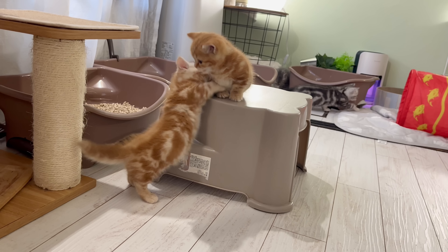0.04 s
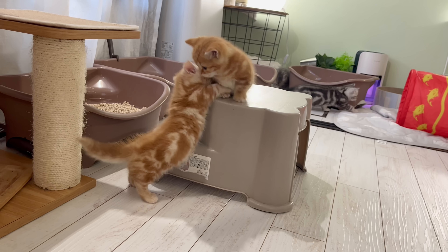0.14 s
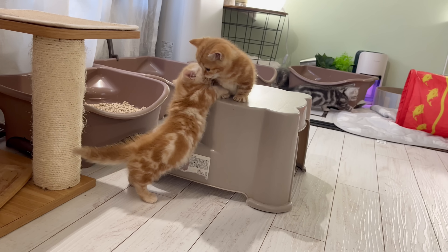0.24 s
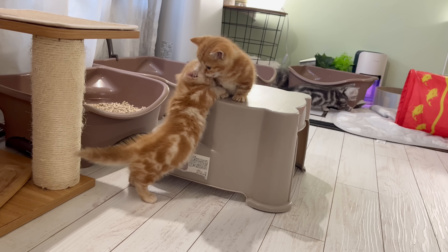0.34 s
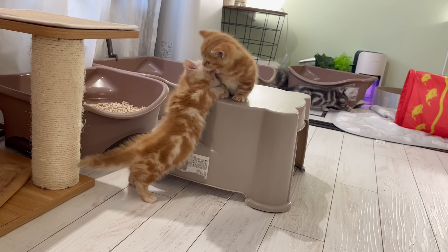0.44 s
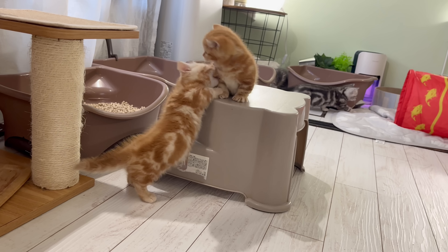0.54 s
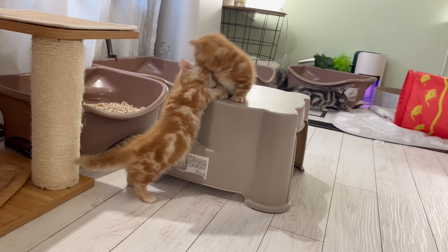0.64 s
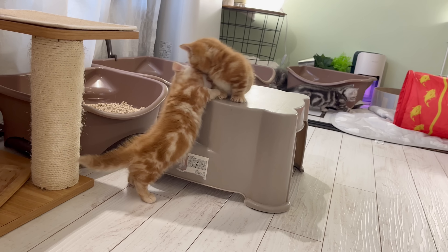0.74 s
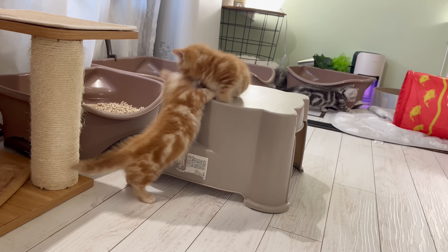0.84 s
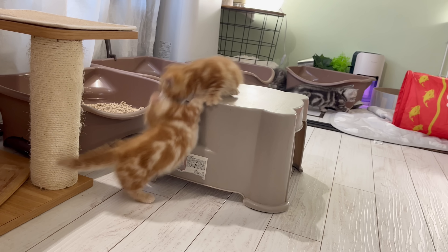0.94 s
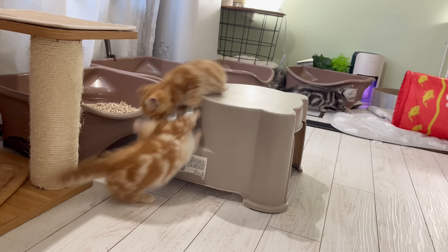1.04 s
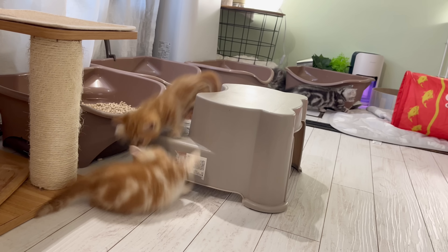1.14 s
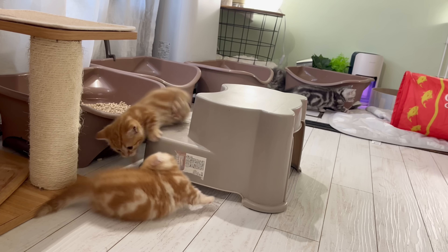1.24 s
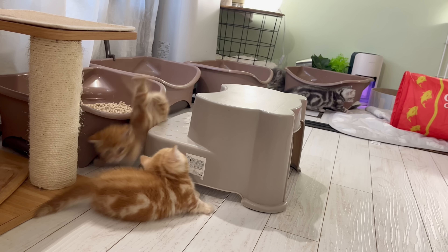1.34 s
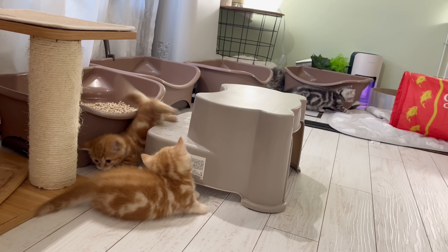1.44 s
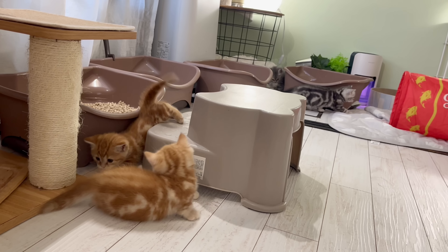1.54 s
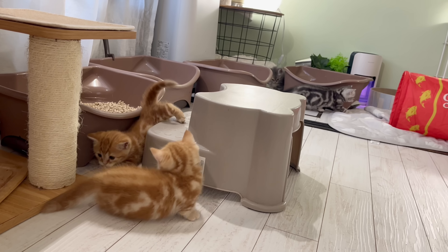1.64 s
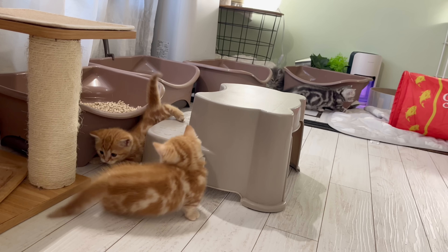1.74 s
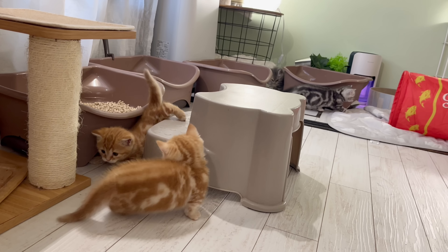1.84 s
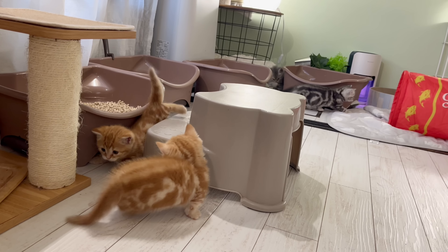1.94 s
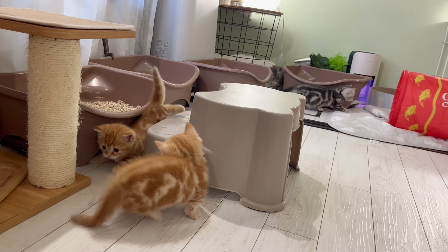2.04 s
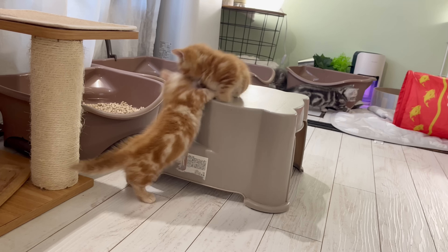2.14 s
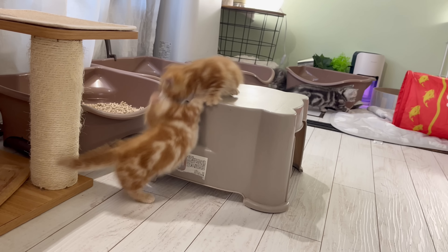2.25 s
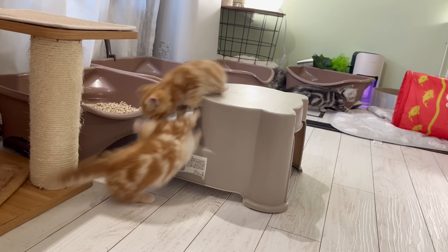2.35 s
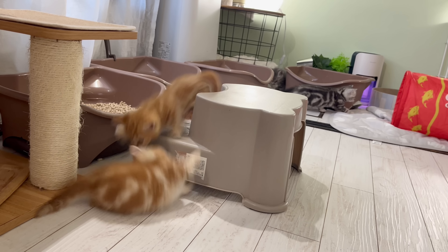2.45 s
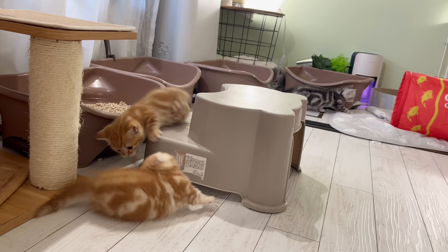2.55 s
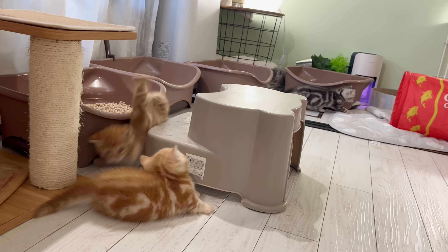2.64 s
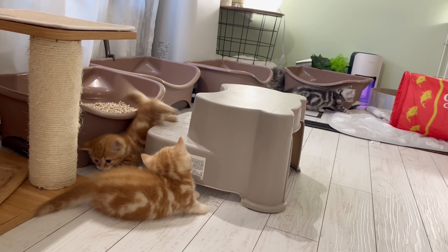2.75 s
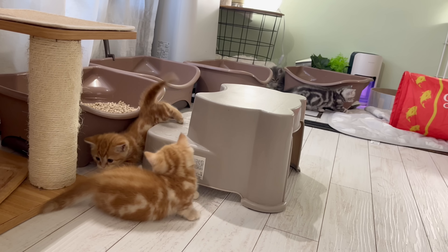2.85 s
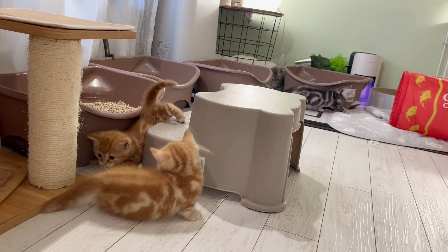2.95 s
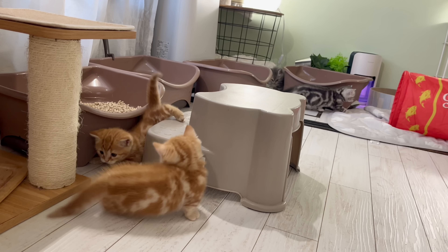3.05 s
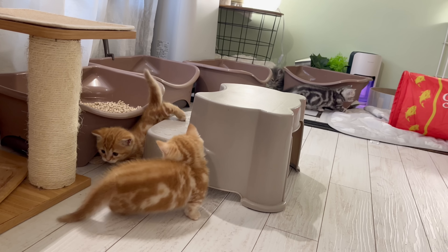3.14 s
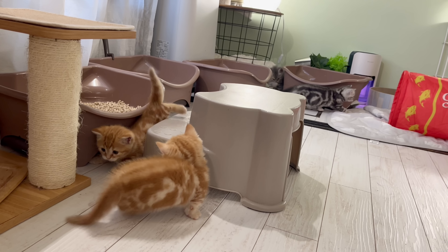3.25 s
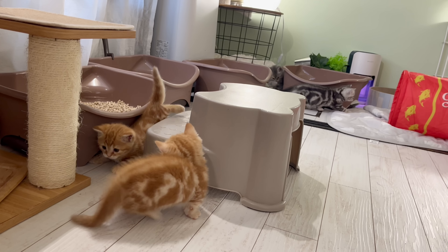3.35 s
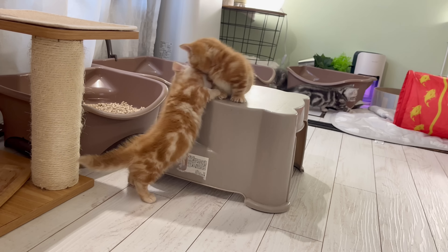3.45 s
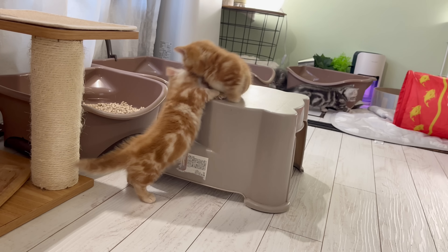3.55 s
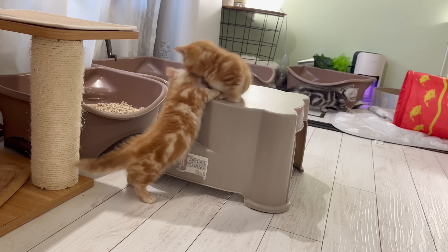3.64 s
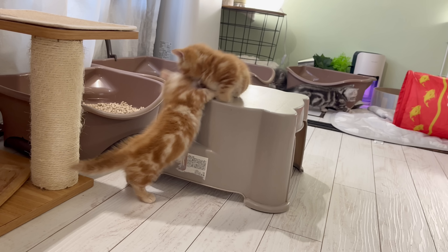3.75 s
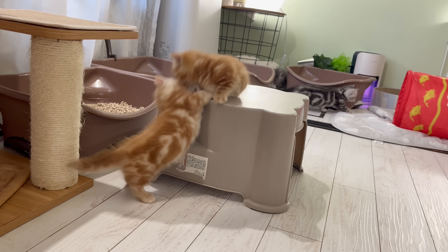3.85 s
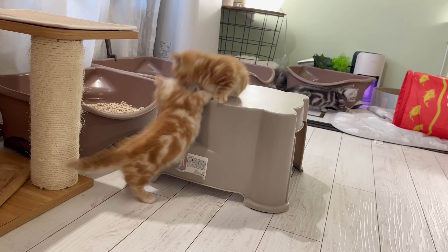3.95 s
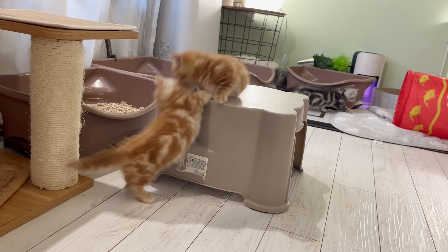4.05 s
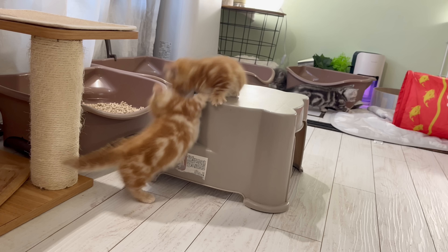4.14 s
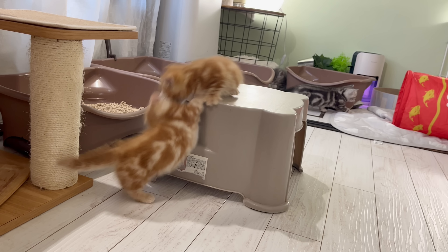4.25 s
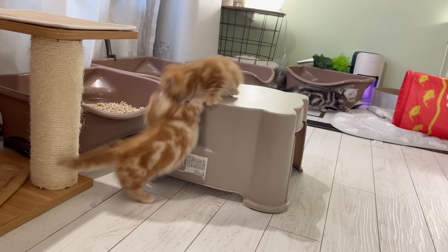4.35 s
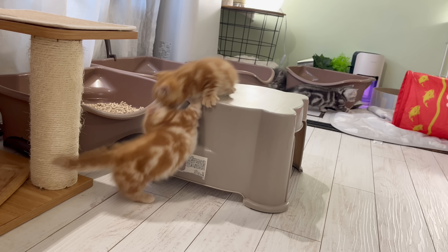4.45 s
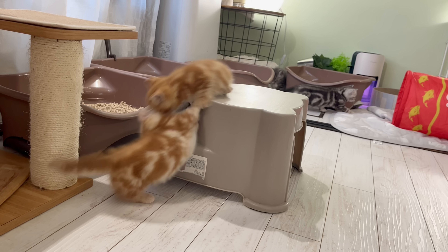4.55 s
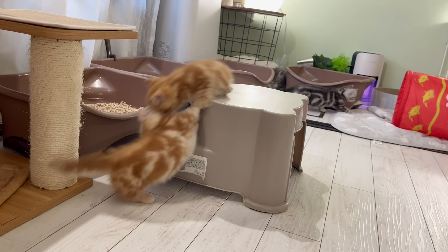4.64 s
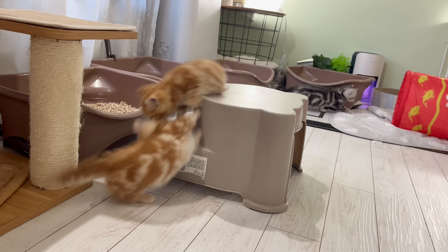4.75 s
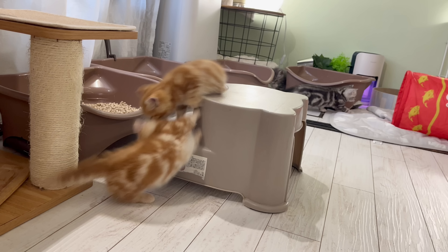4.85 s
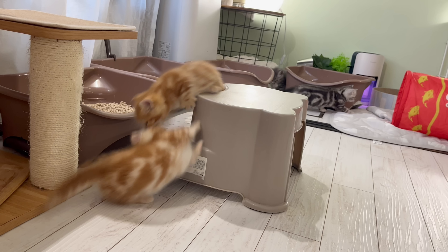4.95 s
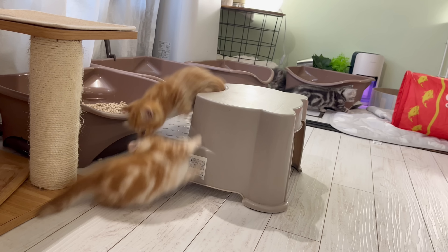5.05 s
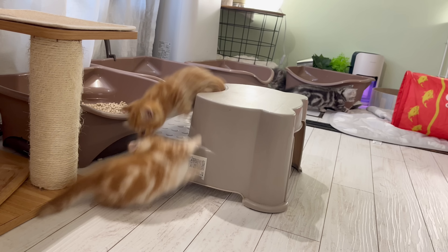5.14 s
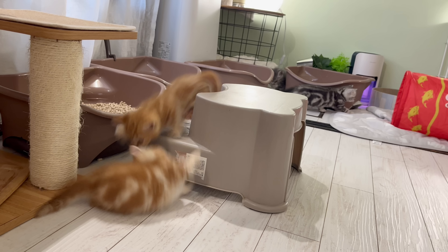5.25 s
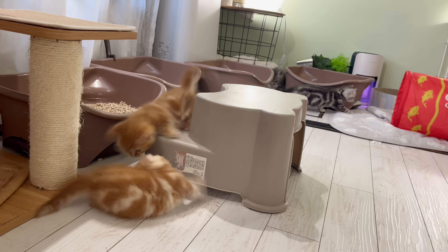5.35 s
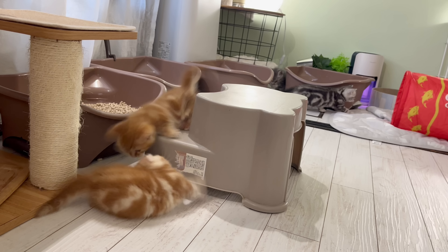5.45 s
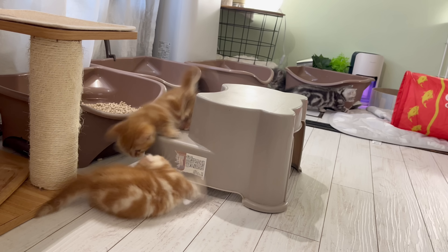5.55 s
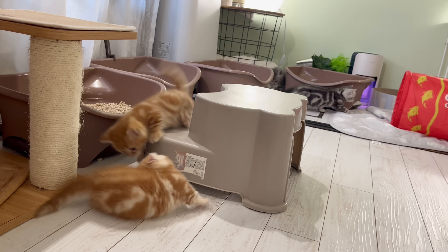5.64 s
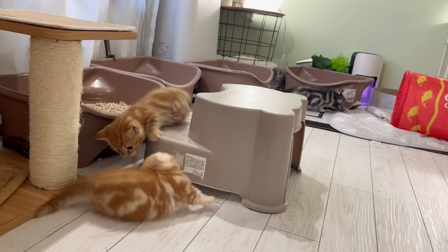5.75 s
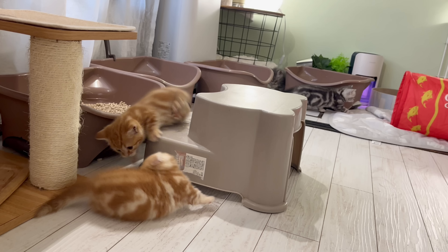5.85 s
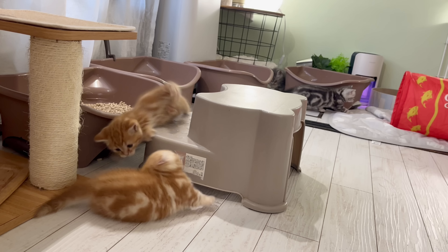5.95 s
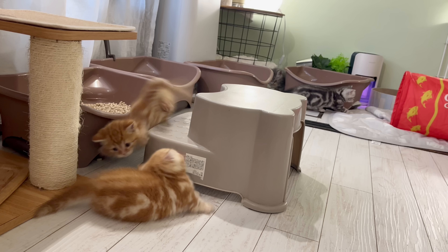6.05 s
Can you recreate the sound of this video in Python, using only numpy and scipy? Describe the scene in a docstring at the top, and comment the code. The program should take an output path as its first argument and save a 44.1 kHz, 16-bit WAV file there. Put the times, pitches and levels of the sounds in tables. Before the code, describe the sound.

Two kittens wrestle on a hollow plastic stool, heard close in stereo in a small furnished room. Faint thuds and scratches, then a loud clattering drop with boomy boards, ringing plastic and brief fur rustle, followed by a lighter scrabble. It plays a second time, then a slow-motion version chops it into short repeating pieces, turning single blows into rattling strings of thumps and scrapes.

```python
"""A quiet room, fans and distant rooms as wavering noise, heard in stereo through two microphone ports.
Kittens wrestle: shaking noise and soft pushes ring the floorboards, more strongly as they tumble off a hollow plastic stool.
Claws scratch its wall (gritty noise bursts and taps ring it), paws pat it (short hollow knocks), fur rustles (bright noise).
The fall is then played a second time, and a third time in slow motion, by short pieces that step back and overlap."""
import sys
import numpy as np
from scipy import signal
from scipy.fft import rfft, irfft
from scipy.io import wavfile
from scipy.ndimage import uniform_filter1d

SR = 44100
rng = np.random.default_rng(int(sys.argv[2]) if len(sys.argv) > 2 else 0)


def master_out(mix):
    """Clip the mix to full scale and print it as 16-bit PCM to the path in sys.argv[1]."""
    frames = np.transpose(np.atleast_2d(mix))
    ceiling = np.clip(frames, -1, 1)
    pcm = np.round(ceiling * 32767).astype(np.int16)
    wavfile.write(sys.argv[1], SR, pcm)


N = 269451

TOP_HZ = 16100  # top of the microphone's range
LIVE = int(2.2 * SR)  # samples of the first, live passage
TIME = np.arange(LIVE) / SR
FREQ = np.maximum(np.arange(LIVE // 2 + 1) * SR / LIVE, 1)
BOTH_SIDES = np.array([[1], [-1]])  # a side signal enters left upright, right inverted


def undb(db):
    """Amplitude factor for a level in dB."""
    return 10 ** (np.asarray(db) / 20)


def along(table):
    """A (Hz, value) table read at every frequency, on a logarithmic pitch scale."""
    hz, value = np.transpose(table)
    return np.interp(np.log(FREQ), np.log(hz), value)


def unit(x):
    """The signal scaled to rms 1."""
    return x / np.sqrt(np.mean(x ** 2))


def noise(colour):
    """Noise of rms 1 with the given colour."""
    spectrum = rfft(rng.standard_normal(LIVE))
    return unit(irfft(spectrum * undb(along(colour)), LIVE))


def add(track, s, sound):
    """Lay a sound into the track at s seconds."""
    i = int(s * SR)
    track[i:i + len(sound)] += sound[:len(track) - i]


def ring(modes, swell=0., ratio=-1):
    """Half a second of decaying modes after a unit blow; each swells over a share of its period.

    Each mode's amplitude is multiplied by one more ratio than the last; -1 turns every other mode over.
    """
    t = TIME[:SR // 2]
    total = 0
    for k, (hz, db, t60) in enumerate(modes):
        decay = 1000. ** (-t / t60)
        onset = 1 - np.exp(-t * hz / (swell + 1e-9))
        total = total + ratio ** k * undb(db) * np.sin(2 * np.pi * hz * t) * decay * onset
    return total


def air():
    """Quiet room tone of fans and distant rooms: coloured noise in mid and side, wavering a little."""
    # room tone colour: pitch_hz, relative level_db (per Hz)
    air_colour = [(25, -15), (55, -1), (110, -3.5), (170, -13.5), (300, -6), (600, -9), (750, -13.5),
                  (2100, -18.5), (2350, -24), (4500, -39), (7500, -87), (8500, -57.5), (11500, -50.5),
                  (13600, -63), (14200, -83)]
    # width of the room tone: pitch_hz, side_minus_mid_db
    air_width = [(60, -12), (110, -10.5), (200, -8.5), (380, -11), (700, -2.5), (1290, 1.5), (2380, -5.5),
                 (4400, 2), (8120, 13), (15000, -28)]
    mid_db, waver_db = -60, .8  # both rms
    side = irfft(rfft(noise(air_colour)) * undb(along(air_width)), LIVE)
    drift = unit(uniform_filter1d(rng.standard_normal(LIVE), size=4000))
    waver = undb(waver_db * drift)
    return undb(mid_db) * waver * (noise(air_colour) + side * BOTH_SIDES)


def boards():
    """Soft pushes, each nearer some modes than others, and a steady shaking drive the low modes of floor and stool."""
    # wrestling weight that shakes stool and boards: time_s, drive level_db
    shake_levels = [(0, -103), (.45, -86.5), (.62, -72.5), (.76, -82), (.86, -77), (1.0, -77),
                    (1.27, -70.5), (1.46, -67.5), (1.54, -80), (1.65, -94), (2.15, -100)]
    # weight landing on the boards: start_s, peak level_db at the boards, favoured pitch_hz
    landings = [(0.133, -49.5, 100), (0.393, -48, 67.5), (0.555, -53, 140), (0.606, -51, 150),
                (0.754, -49, 66.6), (0.832, -44.5, 70), (0.894, -41.5, 75.6), (.986, -33, 110),
                (1.022, -42.5, 110), (1.186, -20, 109), (1.197, -16.5, 82), (1.223, -24, 122),
                (1.258, -27, 95), (1.3, -39, 90), (1.329, -41.5, 89.5), (1.388, -33, 98),
                (1.413, -30.5, 127), (1.431, -29, 112), (1.465, -32.5, 80.5), (1.495, -47, 111),
                (1.629, -50, 70), (1.747, -51.5, 85)]
    # low modes of floor and stool: pitch_hz, level_db (before the mode ratio and nearness), t60_s
    board_modes = [(52, -8, .1), (67, 0, .13), (93, -1, .13), (124, -2, .11), (150, -7, .07),
                   (193, -12, .07)]
    contact_cycles = 0.23  # a push lasts this share of the period it favours
    shake = undb(np.interp(TIME, *np.transpose(shake_levels))) * rng.standard_normal(LIVE)
    out = signal.fftconvolve(shake, ring(board_modes, swell=0.23, ratio=0.96))[:LIVE]
    for s, db, spot_hz in landings:
        push = np.hanning(int(contact_cycles / spot_hz * SR))
        # modes lose level with the square of their distance in octaves
        near = [(hz, g - 15 * np.log2(hz / spot_hz) ** 2, t60) for hz, g, t60 in board_modes]
        boom = signal.fftconvolve(push, ring(near, swell=0.62, ratio=0.73))
        add(out, s, undb(db) * boom / np.abs(boom).max())
    return out


def spells(column, rise_db_s, fall_db_s):
    """Gain that climbs to each spell of rubbing, holds and falls away, both straight in dB."""
    # spells of rubbing on the stool: start_s, length_s, claw_scrape_db, fur_db
    rubs = [(0.9, 0.055, -63.5, -77.5), (1.078, 0.074, -66, -76), (1.193, 0.041, -55, -75.5),
            (1.407, 0.076, -63, -80)]
    gain = 0
    for row in rubs:
        start, length = row[:2]
        before = np.maximum(start - TIME, 0)
        after = np.maximum(TIME - start - length, 0)
        gain = gain + undb(row[column] - rise_db_s * before - fall_db_s * after)
    return gain


def claws():
    """Gritty bursts, each with its own colour, over a thin scrape; bursts and first-touch taps ring the plastic wall."""
    # claws on plastic: start_s, level_db, fade_ms (to 1/e), brightness_db per octave, low-cut pitch_hz
    scratches = [(0.868, -41, 14, -2.5, 2520), (0.948, -58.5, 22, -9.5, 1830), (1.077, -68, 3, 12.5, 1500),
                 (1.102, -46.5, 30, -8, 2630), (1.115, -52, 8.6, 5.5, 2800),
                 (1.1731, -31.5, 7.8, 3.5, 1460), (1.1811, -38, 2.7, -16.5, 1950),
                 (1.193, -41, 23, -5, 2200), (1.377, -65, 3.3, 6, 2400), (1.401, -42.5, 6.3, -1.5, 2700),
                 (1.422, -51.5, 15, -12, 1600), (1.444, -63, 20, -14.5, 1050),
                 (1.494, -56.5, 18, -14.5, 2010)]
    # colour of claw grit: pitch_hz, relative level_db (per Hz)
    grit_colour = [(900, -5.5), (1500, -2), (2000, -5), (2800, -4), (3900, -6), (4700, -7.5), (6000, -13),
                   (7500, -16), (9000, -18), (11000, -19.5), (13500, -35), (14500, -24), (16000, -58)]
    # modes of the thin wall: pitch_hz, relative level_db, t60_s
    wall_modes = [(1247, -10, .07), (1743, -10, .05), (1865, -7, .07), (2068, -1, .06), (2224, 0, .07),
                  (2470, -6, .06), (2620, -5, .05), (2741, -4, .05), (3112, -8, .04), (3630, -4, .06),
                  (4190, -7, .06), (4570, -3, .05), (4690, 0, .07), (4830, 0, .08)]
    rise_share = 0.16  # rise as a share of the fade
    wall_ring_db, wall_tap_db = -15, 24.5  # how strongly burst and first touch drive the wall
    tap_dull_db = -10.5  # per octave above 2200 Hz
    hard_db, hardness = -34, 1.1  # the drive changes this many dB more per dB above or below hard_db
    scrape_rest_db, scrape_rise_db_s, scrape_fall_db_s = -83, 350, 237

    out, drive = np.zeros(LIVE), np.zeros(LIVE)
    t_ms = TIME[:SR // 4] * 1000
    grit = unit(uniform_filter1d(rng.standard_normal(LIVE), size=40))
    hiss = noise(grit_colour) * undb(2.5 * grit)
    burst_len = LIVE // 8
    hz = FREQ[:LIVE // 16 + 1] * 8  # frequencies of the shorter transform
    tap_tilt = undb(tap_dull_db * np.log2(np.clip(hz / 2200, 1, 8)))
    for s, db, fade_ms, bright_db, low_hz in scratches:
        rise_ms = rise_share * fade_ms
        fade = np.exp(-np.maximum(t_ms - rise_ms, 0) / fade_ms)
        shape = np.minimum(t_ms / rise_ms, 1) ** 2 * fade
        tilt = undb(bright_db * np.log2(np.clip(hz, 500, 16000) / 3500))
        below = low_hz / hz
        low_cut = 1 / (1 - np.sqrt(2) * 1j * below - below ** 2) ** 2
        grain = shape * hiss[int(s * SR):][:len(t_ms)]
        burst = undb(db) * irfft(rfft(grain, burst_len) * tilt * low_cut)
        gentle_cut = low_cut / np.sqrt(np.abs(low_cut) + 1e-9)  # half as steep
        tap = undb(db + wall_tap_db) * irfft(gentle_cut * tap_tilt)
        add(out, s, burst)
        add(drive, s, undb(hardness * (db - hard_db)) * (undb(wall_ring_db) * burst + tap))
    wall = ring(wall_modes)
    wall_sound = signal.fftconvolve(drive, wall / np.linalg.norm(wall))[:LIVE]
    scrape = undb(scrape_rest_db) + spells(2, scrape_rise_db_s, scrape_fall_db_s)
    return out + scrape * hiss + wall_sound


def pats():
    """Short hollow knocks; the spot that is hit favours the modes near one pitch."""
    # paw pats on the stool wall: start_s, peak level_db at the stool, favoured pitch_hz
    paw_pats = [(.868, -48.5, 1540), (.903, -47.5, 322), (.941, -45, 765), (.980, -37.5, 295),
                (1.159, -33, 305), (1.177, -24.5, 414), (1.178, -35.5, 680), (1.183, -27.5, 355),
                (1.187, -28.5, 250), (1.203, -37.5, 855), (1.291, -40.5, 710), (1.379, -44.5, 790),
                (1.387, -39, 297), (1.405, -38, 760), (1.589, -49.5, 514)]
    # hollow body of the stool: pitch_hz, relative level_db (before nearness and scatter), t60_s (before the paw damps it)
    hollow_modes = [(250, 0, .06), (325, -2, .045), (365, 0, .05), (415, 1, .05), (500, -7, .035),
                    (655, 1, .045), (720, 0, .04), (810, -2, .035), (980, -7, .03), (1450, -5, .04)]
    paw_damp = 2.15  # the paw shortens the ring by this factor
    out = np.zeros(LIVE)
    for s, db, spot_hz in paw_pats:
        struck = []
        for hz, g, t60 in hollow_modes:
            far_db = 45 * np.log2(hz / spot_hz) ** 2
            scatter_db = 1.5 * rng.standard_normal()
            struck.append((hz, g - far_db + scatter_db, t60 / paw_damp))
        knock = ring(struck, swell=0.033)
        add(out, s, undb(db) * knock / np.abs(knock).max())
    return out


def fur():
    """A soft bright rustle, finer and steadier than the claws: coloured noise that follows the rubbing."""
    # colour of rubbing fur: pitch_hz, relative level_db (per Hz)
    fur_colour = [(2500, -19), (4500, 1), (7000, -8), (9000, 5), (11500, -3), (13700, -1), (14300, -14),
                  (16000, -37)]
    return spells(3, rise_db_s=298, fall_db_s=83) * noise(fur_colour)


def room(x):
    """Diffuse tail of decaying noise, band by band; bass and top are more alike in both channels than the middle."""
    # decay of the room: lower band pitch_hz, t60_s
    room_decay = [(100, 0.068), (500, 0.27), (2000, 0.3), (6000, 0.22), (14000, 0.033)]
    room_db, build_s = -7.5, 0.0025
    t, tail = TIME[:SR // 2], 0
    next_hz = [row[0] for row in room_decay[1:]] + [TOP_HZ]
    for (hz, t60), top in zip(room_decay, next_hz):
        upper = top * .5 if top < TOP_HZ else top
        band = signal.butter(2, [hz * .5, upper], "band", fs=SR, output="sos")
        mid, side = signal.sosfilt(band, rng.standard_normal((2, len(t)))) * 1000. ** (-t / t60)
        width = np.interp(np.log(hz), np.log([100, 2000, 14000]), [.7, .95, .6])
        tail = tail + mid + width * side * BOTH_SIDES
    tail = tail * (1 - np.exp(-t / build_s))
    tail = tail / np.linalg.norm(tail[0])
    return undb(room_db) * signal.fftconvolve(x[None], tail, axes=1)[:, :LIVE]


def ports(x):
    """The two microphone ports hear each channel with their own level and phase, split evenly between them."""
    # level between the ports: pitch_hz, left_minus_right_db
    port_level = [(60, 1), (200, 1.5), (1290, 1.5), (2380, 4), (4400, 8), (7500, .5), (15000, 0)]
    # phase between the ports; in opposite phase the centre loses the band: pitch_hz, left_lead_radians
    port_lead = [(100, 0), (950, .3), (1380, -.9), (2150, .7), (4220, .9), (5250, .1), (5680, -1.1),
                 (7060, -1.5), (7670, -3), (9560, -3.4), (10900, -5), (13400, -7.2), (15900, -9.4)]
    half = undb(along(port_level) / 2) * np.exp(.5j * along(port_lead))
    return irfft(rfft(x) * np.array([half, 1 / half]), LIVE)


def replay(live):
    """Each piece reaches back by its own lag and is cross-faded over the one before."""
    # each slow piece starts a little off its even place: further_back_ms
    slip_ms = [0, 2.14, -12.3, 2.74, 1.25, 6.48, -9.09, .64, -6.79, 8.91, -2.13, 7.27, 12.54, 4.43, 12.55,
               -8.71, 6.04, -2.48, 12.56, 2.68, .47, 3.63, 3.93]
    again_s, again_back_s = 2.118, 1.30054  # second playing: start, lag
    slow_s, slow_back_s = 3.4185, 2.58796  # slow motion: start, first lag
    slow_speed, piece_s, fade_s = .2, .11918, .0045
    t, out = np.arange(N), np.zeros((2, N))
    out[:, :LIVE] = live
    even = np.arange(len(slip_ms)) * piece_s
    # pieces run at full speed, but their starts advance through the fall at slow_speed
    backs = slow_back_s + (1 - slow_speed) * even + np.array(slip_ms) / 1000
    for s, back in zip([again_s, *(slow_s + even)], [again_back_s, *backs]):
        share = np.clip((t / SR - s) / fade_s + .5, 0, 1)
        earlier = live[:, np.clip(t - round(back * SR), 0, LIVE - 1)]
        out = (1 - share) * out + share * earlier
    return out


def scene():
    """The tumble in its room through the ports, over the room tone, then its replays."""
    dry = boards() + claws() + pats() + fur()
    live = ports(dry + room(dry)) + air()
    return replay(live)


def record(dry):
    """The phone thins the deepest bass, rounds the loudest peaks and cuts the top."""
    bass_cut_hz, ceiling = 57.6, 0.18
    thin = signal.sosfilt(signal.butter(2, bass_cut_hz, "high", fs=SR, output="sos"), dry)
    soft = ceiling * np.tanh(thin / ceiling)
    return signal.sosfilt(signal.ellip(10, .2, 90, TOP_HZ, fs=SR, output="sos"), soft)


dry = scene()
out = record(dry)
master_out(out)
```